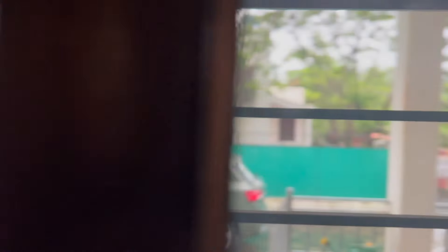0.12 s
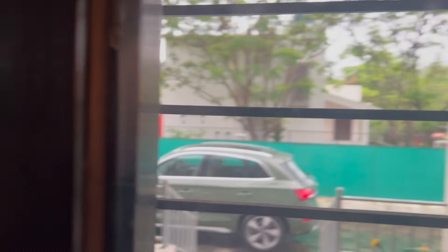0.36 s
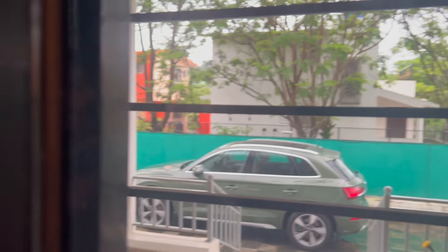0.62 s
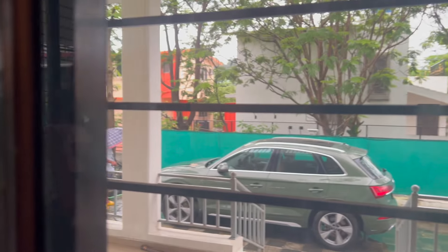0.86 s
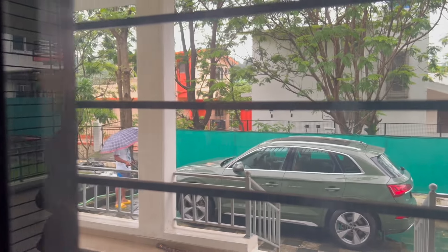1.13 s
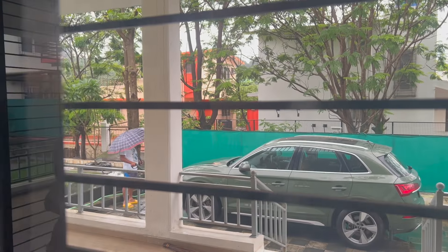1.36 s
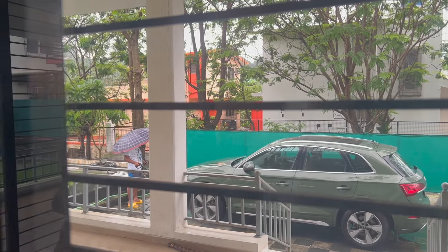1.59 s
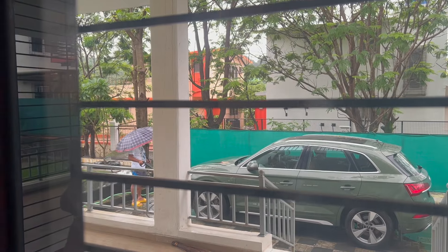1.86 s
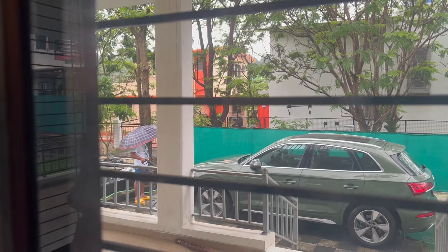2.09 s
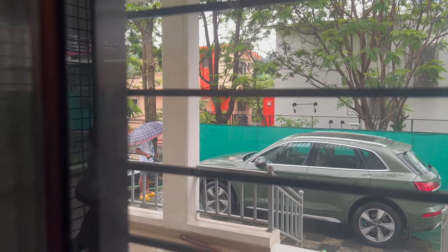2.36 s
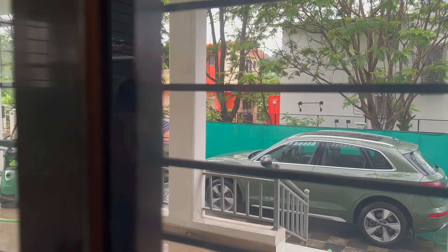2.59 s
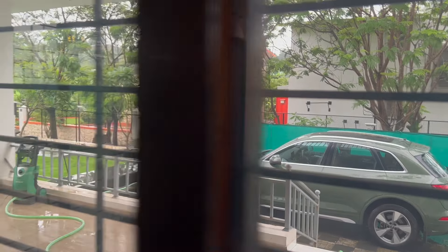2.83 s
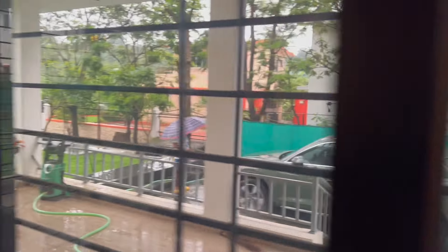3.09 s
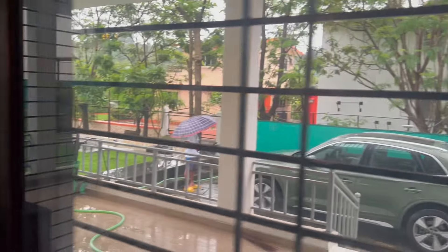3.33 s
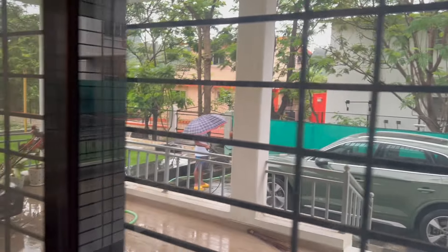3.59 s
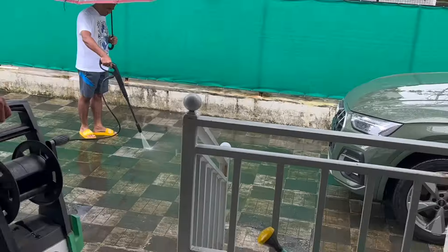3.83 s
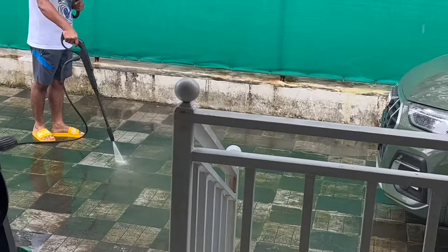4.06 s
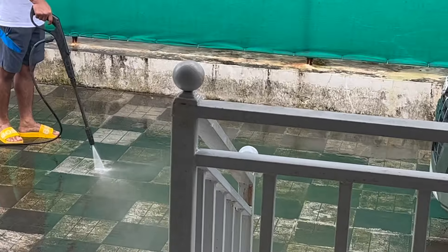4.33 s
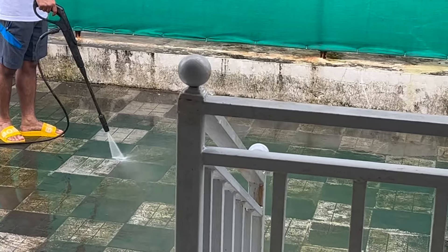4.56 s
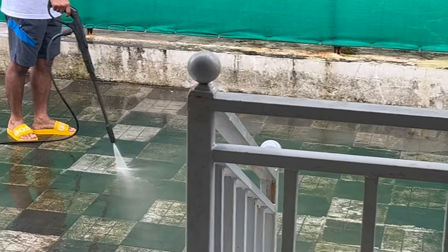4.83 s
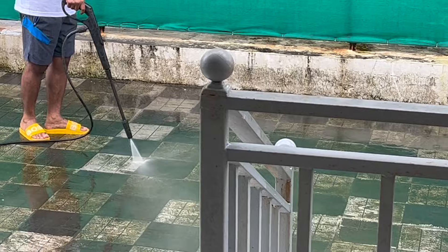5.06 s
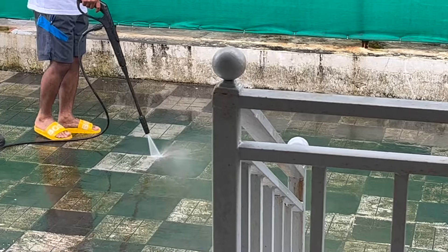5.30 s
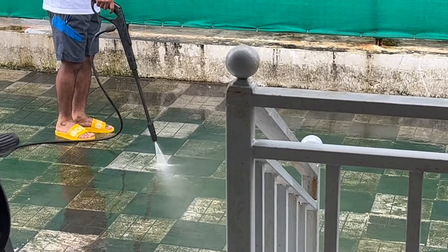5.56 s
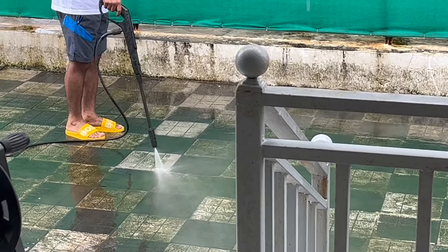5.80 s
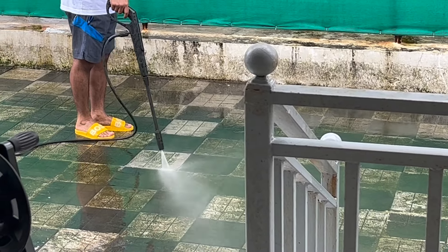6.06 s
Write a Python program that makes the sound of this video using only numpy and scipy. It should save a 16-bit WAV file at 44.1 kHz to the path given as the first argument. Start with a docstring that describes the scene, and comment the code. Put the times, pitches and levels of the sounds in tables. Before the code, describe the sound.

A handheld microphone moves along windows, hearing a continuous low buzzing pump with a thin gear whine and soft wash of spray and rain. Early handling thumps and a sharp tick stand close in front, with more low bumps around two seconds. Then an instant change of place: outdoors, right beside the washer, a dense rattling motor drone and bright jet hiss fill everything, steady and nearly overloaded.

```python
"""An electric pressure washer runs without pause on a wet porch, first heard through a window by a moving listener.
Its pump shaft drones in many orders, its gear whines, and jet and rain hiss as coloured noise. Low noise and bumps
make the handling, and a small hard tick sounds early on. Orders swell and the hiss brightens along the walk.
Then the place suddenly changes to close by and very loud."""
import sys
import numpy as np
from scipy import signal
from scipy.fft import rfft, irfft
from scipy.io import wavfile

SR = 44100
rng = np.random.default_rng(int(sys.argv[2]) if len(sys.argv) > 2 else 0)


def persist_wave(psi):
    """Save psi, clipped to +-1, as 16-bit WAV."""
    counts = np.round(np.clip(psi, -1, 1) * 32767).astype(np.int16)
    wavfile.write(sys.argv[1], SR, np.atleast_2d(counts).T)


def undo_db(level):
    """Turn decibels back into plain size, where 20 dB means ten times bigger."""
    steps = np.asarray(level, float) / 20
    return 10 ** steps


N = 272097
NEAR, FAR = 1, 2   # column of each place in the tables that hold both


def rms_one(x):
    """Scales a signal to an rms of 1."""
    return x / np.sqrt(np.mean(x ** 2) + 1e-20)


def in_time(rows):
    """Draws straight lines between rows of (seconds, values ..), one curve a column."""
    s, *columns = np.transpose(rows)
    return [np.interp(np.arange(N) / SR, s, c) for c in columns]


def at_hz(points, hz, column=1):
    """Reads a table over a logarithmic frequency axis."""
    points = np.array(points)
    return np.interp(np.log(np.maximum(hz, 1)), np.log(points[:, 0]), points[:, column])


def drift(rate_hz):
    """Slow chance of spread 1: lowpassed random knots, 40 a second, joined by straight lines."""
    knots = rng.standard_normal(int(N / SR * 40) + 42)
    memory = np.exp(-2 * np.pi * rate_hz / 40)
    slow = rms_one(signal.lfilter([1], [1, -memory], knots)[40:])
    return np.interp(np.arange(N) * 40 / SR, np.arange(len(slow)), slow)


def band(x, low_hz, high_hz):
    """Passes one band of frequencies."""
    return signal.sosfilt(signal.butter(2, [low_hz, high_hz], "band", fs=SR, output="sos"), x)


# The listener's walk along the windows. Each row: time in seconds, share of the way (0-1).
WALK_PATH = [(0, 0), (1, .224), (2.2, .466), (2.7, .534), (3.85, 1)]
# Shaft orders with standing-wave crests along the way. Each entry: multiple of the shaft rate.
SWELLING_ORDERS = [4, 5, 6, 7, 9, 11, 12, 13, 14, 16, 18, 23, 50, 100]
# The standing wave of each of those orders. Each row: place of a crest as share of the way, crest spacing
# as share of the way, echo strength (0-1), level change in dB at the start of the way, same at its end.
STANDING_WAVES = [(.4, .76, .48, 2.5, -6), (.33, .71, .43, -.5, 1.5), (.36, .63, .29, 3.5, -4.5),
                  (.356, .45, .83, -5, 5.5), (.3, .55, .37, -3, 4), (.5, 1, .4, -1, -1),
                  (.03, .63, .59, 5, -1), (.29, .3, .18, -.5, 3), (.18, .635, .26, -1, 3),
                  (.45, 1.08, .6, 1, -1), (.5, .59, .43, -2.5, 7), (.355, .432, .56, -5.5, 8.5),
                  (.088, .244, .75, 3, 5), (.336, .432, .58, 7.5, 0)]


def crests():
    """A direct and an echoed wave beat along the way: dB change of each swelling order over time."""
    way, = in_time(WALK_PATH)
    swells = {}
    for k, (place, spacing, echo, start_db, end_db) in zip(SWELLING_ORDERS, STANDING_WAVES):
        both_waves = abs(1 + echo * np.exp(2j * np.pi * (way - place) / spacing))
        trend_db = start_db + (end_db - start_db) * way
        swells[k] = trend_db + 20 * np.log10(both_waves / np.hypot(1, echo))
    return swells


# Shaft orders through the window; 50 and 100 are the gear teeth.
# Each row: multiple of the shaft rate, centre level in dB rms before swell and waver, side minus centre in dB.
FAR_SHAFT_ORDERS = [(1, -44, -22), (2, -44, -23), (3, -40, -21), (4, -38, -4), (5, -37, -4), (6, -35, -3),
                    (7, -36, 3), (8, -47, -1), (9, -42, -5), (10, -55, 5), (11, -37, -3), (12, -41, 1),
                    (13, -42, -5), (14, -43, -5), (15, -48, -1), (16, -45, -4), (17, -52, -2),
                    (18, -46, -1), (19, -52, 2), (20, -54, 7), (21, -57, 3), (22, -51, -3), (23, -47, -4),
                    (24, -54, 1), (25, -55, 4), (26, -56, 0), (28, -54, 0), (31, -57, -2), (34, -59, -4),
                    (50, -50, -7), (100, -62, -2)]
# Shaft orders close by; 50 and 100 are the gear teeth.
# Each row: multiple of the shaft rate, centre level in dB rms before waver, side minus centre in dB.
NEAR_SHAFT_ORDERS = [(1, -34, -25), (2, -23, -21), (3, -27, -12), (4, -13, -20), (5, -29, -15),
                     (6, -28, -9), (7, -23, -14), (8, -29, -2), (9, -22, -5), (10, -29, -9), (11, -24, -11),
                     (12, -26, -2), (13, -29, 1), (14, -31, -11), (15, -26, -2), (16, -36, -4),
                     (17, -36, -4), (18, -30, -6), (19, -30, -14), (20, -32, -16), (21, -41, -7),
                     (22, -34, -10), (23, -32, -27), (24, -30, -36), (28, -36, -36), (30, -36, -36),
                     (47, -40, -12), (48, -39, -14), (49, -36, -14), (50, -25, -11), (52, -42, -12),
                     (55, -40, -12), (56, -40, -13), (96, -45, -26), (99, -42, -23), (100, -30, -23),
                     (103, -42, -47)]
# Torque ripple of the mains, as side tones beside the pump's orders.
# Each row: multiple of the ripple rate, level against the order in dB near, same far.
TORQUE_RIPPLE = [(1, -13.5, -17), (-1, -24, -32), (2, -39, -20), (-2, -52, -25)]
RIPPLE_HZ = 100
# Unbalance of the rotor and its side tones.
# Each row: distance from the rotor rate in shaft orders, centre level in dB rms near, same far.
ROTOR_TONES = [(-2, -34, -57), (-1, -35, -54), (0, -24, -39), (1, -29, -55), (2, -40, -51), (3, -40, -54),
               (4, -37, -45), (5, -36, -52), (6, -39, -50), (10, -37, -54), (13, -37, -56), (49, -43, -65),
               (50, -41, -63), (51, -41, -65)]
ROTOR_ORDER = 50 / 11   # rotor turns per shaft turn
SECOND_KNOCK = .545   # the valves knock twice a turn, the second after this share of it


def machine(span, turns, orders, place, waver_db, swells, smear_rad):
    """Shaft orders and rotor tones as centre and side; the mains ripple adds side tones to orders below 30."""
    pump, gear = np.zeros((2, 2, len(turns)), complex)
    for k, level_db, side_db in orders:
        # orders line up into two knocks, smeared by echoes
        knocks = np.angle(1 + np.exp(-2j * np.pi * k * SECOND_KNOCK))
        phase = np.exp(1j * (knocks + smear_rad * rng.standard_normal()))
        side_start = rng.choice([-1j, 1j]) * undo_db(side_db)   # a quarter cycle off: left or right leads
        start = phase * np.array([[1], [side_start]])
        level = undo_db(level_db + swells.get(k, 0) + waver_db * drift(1.8)[span])
        tone = start * (level * np.exp(2j * np.pi * k * turns))
        part = pump if k < 30 else gear
        part += tone
    ripple_phase = 2j * np.pi * RIPPLE_HZ * np.arange(len(turns)) / SR
    pump *= 1 + sum(undo_db(row[place]) * np.exp(row[0] * ripple_phase) for row in TORQUE_RIPPLE)
    for row in ROTOR_TONES:
        start = np.exp(2j * np.pi * rng.random()) * np.array([[1], [1j * undo_db(-9.5)]])
        gear += start * undo_db(row[place]) * np.exp(2j * np.pi * (ROTOR_ORDER + row[0]) * turns)
    return np.sqrt(2) * (pump + gear).real


# Trend of the many faint higher orders. Each row: multiple of the shaft rate, level in dB near, same far.
FAINT_LEVELS = [(25, -45, -62), (45, -44, -65), (60, -46, -68), (72, -49, -72), (84, -54, -74),
                (96, -48, -72), (105, -46, -75)]


def faint_orders(turns, orders, place, spread_db, side_db):
    """One shaft turn holding the remaining higher orders at uneven levels, repeated."""
    k = np.setdiff1d(np.arange(25, 106), np.array(orders)[:, 0].astype(int))
    level = undo_db(at_hz(FAINT_LEVELS, k, place) + spread_db * rng.standard_normal((2, len(k))))
    lines = np.zeros((2, 2049), complex)
    lines[:, k] = level * np.exp(2j * np.pi * rng.random((2, len(k))))
    one_turn = irfft(lines) * 4096 / np.sqrt(2)
    repeated = np.array([np.interp(turns % 1 * 4096, np.arange(4096), c) for c in one_turn])
    return repeated * undo_db(np.array([[0], [side_db]]))


# Jet, splash and rain through the window.
# Each row: frequency in Hz, centre and side power together in dB per Hz before flicker and treble change.
FAR_HISS_COLOUR = [(40, -65), (80, -58.5), (150, -60.5), (280, -57), (500, -60.5), (800, -58.5),
                   (1200, -62.5), (1800, -66), (2500, -73.5), (3100, -72), (4500, -79.5), (7000, -79),
                   (10000, -90), (11500, -87), (15500, -97)]
# Jet, splash and rain close by.
# Each row: frequency in Hz, centre and side power together in dB per Hz before flicker and treble change.
NEAR_HISS_COLOUR = [(40, -53), (80, -60.5), (150, -52.5), (280, -45), (500, -48), (800, -48), (1200, -51),
                    (2300, -59.5), (2750, -56), (3400, -59.5), (5400, -62.5), (7000, -58.5), (10000, -62),
                    (11500, -58), (15500, -64)]
# Width of the hiss: the side outweighs the centre around 10 kHz, the centre outweighs it near 13.8 kHz.
# Each row: frequency in Hz, side minus centre in dB near, same far.
HISS_WIDTH = [(60, -6, -21), (200, -17, -21), (326, -20, -4), (560, -3, 1), (1100, -8, 1), (1700, -23, 4.5),
              (2230, -33, -2.5), (3400, -4.5, 3.5), (4900, -27, -4.5), (7650, -13, 0.5), (8660, -6, -2),
              (9230, 17, 7.5), (10170, 38, 33), (10920, 4.5, 4), (12250, -4, -3), (13300, -28, -18),
              (13800, -36, -25), (14300, -3.5, -1)]


def hiss(span, turns, spectrum, place, treble_db, patchy_db, throb, tied):
    """Coloured noise as centre and side; octave bands flicker, and the pressure throbs with the pistons."""
    length = len(turns)
    hz = np.fft.rfftfreq(length, 1 / SR)
    side = undo_db(at_hz(HISS_WIDTH, hz, place))
    split = np.array([np.ones_like(side), side]) / np.sqrt(1 + side ** 2)
    colour = undo_db(at_hz(spectrum, hz)) * np.sqrt(SR / 2) * split
    centre, other = rfft(rng.standard_normal((2, length)))
    # tied: share of the side's power that is the centre, a quarter cycle off
    noise = np.array([centre, 1j * np.sqrt(tied) * centre + np.sqrt(1 - tied) * other]) * colour
    together, out = drift(3.8)[span], 0
    for octave in range(9):   # overlapping bands centred on 60 Hz, 120 Hz, ..
        share = np.cos(np.clip(np.log2(hz / 60 + 1e-9) - octave, -1, 1) * np.pi / 2) ** 2
        flicker_db = patchy_db * (0.32 * together + 0.9 * drift(16)[span])
        brightness_db = treble_db * np.clip(octave - 4, 0, 3) / 3
        out = out + undo_db(flicker_db + brightness_db) * irfft(noise * share, length)
    angle = 2 * np.pi * turns
    return out * (1 + throb * (np.cos(angle) + 1.1 * np.cos(2 * angle) + 0.41 * np.cos(3 * angle)))


# Gusts on the microphone. Each row: middle in seconds, level at the middle in dB, half length in seconds.
GUST_ROWS = [(0, -37, 0.26), (.6, -43, .2), (1.25, -36, .12), (1.928, -30, .2)]
# Soft low bumps of handling. Each row: start in seconds, level in dB, pitch in Hz.
HANDLING_BUMPS = [(.06, -29, 163), (.135, -21.5, 127.5), (.2, -29, 104), (.48, -23.5, 166), (.535, -25, 99),
                  (.63, -31, 95), (1.791, -25, 200), (1.955, -19, 98), (2.059, -27, 130)]
RUMBLE_START_DB, RUMBLE_FADE_DB_PER_S = -41, 4.5   # dull rumble between gusts


def rumble():
    """Low noise swelling in gusts, and bumps of ring and thud, nearly the same on both sides."""
    t = np.arange(N) / SR
    gusts = sum(undo_db(db) * np.exp(-((t - s) / half_s) ** 2) for s, db, half_s in GUST_ROWS)
    steady = undo_db(RUMBLE_START_DB - RUMBLE_FADE_DB_PER_S * t)
    out = (steady + gusts) * rms_one(band(rng.standard_normal(N), 83, 430))
    since = np.arange(SR // 4) / SR
    swell_and_fade = undo_db(-60 * since / 0.17) * (1 - np.exp(-since / 0.016))
    thuds = rng.standard_normal((len(HANDLING_BUMPS), len(since)))
    for (s, level_db, hz), thud in zip(HANDLING_BUMPS, thuds):
        ring = np.sin(2 * np.pi * hz * since)
        body = ring + .6 * rms_one(band(thud, .7 * hz, 2.2 * hz))
        first = round(s * SR)
        out[first:first + len(since)] += undo_db(level_db) * swell_and_fade * 2 * body
    return out * undo_db(np.array([[0], [-16]]))   # centre, side


# A small hard tick and its bounce. Each row: start in seconds, level in dB.
TICK_HITS = [(0.131, -18), (0.137, -31)]
# Bands of the tick. Each row: low edge in Hz, high edge in Hz, level in dB, tail against the burst in dB.
TICK_BANDS = [(3150, 3670, -4.5, -25), (3830, 5350, -2.5, -18), (5600, 8800, -14, -16),
              (11000, 14000, -17, -24)]


def ticks():
    """Each tick is a burst of bright noise of a few ms with a tail from the walls."""
    out, t, white = np.zeros((2, N)), np.arange(SR) / SR, rng.standard_normal((2, SR))
    hits = np.array(TICK_HITS)
    since = np.array([np.where(t >= s, t - s, 9) for s in hits[:, 0]])   # 9 s: silent before the hit
    for low_hz, high_hz, level_db, tail_db in TICK_BANDS:
        decay = undo_db(-60 * since / 0.011) + undo_db(tail_db - 60 * since / 0.47)
        envelope = undo_db(hits[:, 1]) @ decay
        burst = band(band(white * envelope, low_hz, high_hz), low_hz, high_hz)
        out[:, :SR] += undo_db(level_db) * np.sqrt(SR / 2 / (high_hz - low_hz)) * burst
    return out * undo_db(np.array([[-2], [-7]]))   # centre, side


# The listener turns. Each row: time in seconds, lean of the low middle as left minus right in dB.
LISTENER_TURN = [(0, -3), (1.7, -5.5), (2.7, -5), (3.1, 2), (3.8, 0)]


def lean(left_right):
    """The low middle leans to one side as the listener turns."""
    lean_db, = in_time(LISTENER_TURN)
    low_middle = signal.sosfiltfilt(signal.butter(1, [170, 800], "band", fs=SR, output="sos"), left_right)
    return left_right + (undo_db(np.array([[.5], [-.5]]) * lean_db) - 1) * low_middle


FAR_TURNS_PER_S, NEAR_TURNS_PER_S = 60.025, 60.625   # pump shaft
SLOW_START_TURNS_PER_S, SETTLE_S = .18, .6   # at first the shaft runs this much slower, and picks up
# the hiss brightens along the way to the open window
TREBLE_START_DB, TREBLE_RISE_DB_PER_SHARE, TREBLE_TOP_DB = -3, 9, 0
MOVE_S, MOVE_LENGTH_S = 3.862, 0.017   # middle and length of the crossfade to the porch


def scene():
    """The far place gives way to the near one; centre and side become left and right."""
    t = np.arange(N) / SR
    far_speed = FAR_TURNS_PER_S - SLOW_START_TURNS_PER_S * np.clip(1 - t / SETTLE_S, 0, 1)
    turns = np.cumsum(np.where(t < MOVE_S, far_speed, NEAR_TURNS_PER_S)) / SR
    far, near = slice(0, 172032), slice(N - 102400, N)   # samples; they overlap around the move
    far_turns, near_turns = turns[far], turns[near]

    way, = in_time(WALK_PATH)
    treble_db = np.minimum(TREBLE_START_DB + TREBLE_RISE_DB_PER_SHARE * way, TREBLE_TOP_DB)[far]
    swells = {k: db[far] for k, db in crests().items()}
    indoors, porch = rumble() + ticks(), np.zeros((2, N))
    indoors[:, far] += machine(far, far_turns, FAR_SHAFT_ORDERS, FAR, waver_db=0.94, swells=swells, smear_rad=3.15)
    indoors[:, far] += hiss(far, far_turns, FAR_HISS_COLOUR, FAR, treble_db=treble_db,
                            patchy_db=0.96, throb=0.039, tied=.1)
    indoors[:, far] += faint_orders(far_turns, FAR_SHAFT_ORDERS, FAR, spread_db=3.0, side_db=-1.0)

    porch[:, near] += machine(near, near_turns, NEAR_SHAFT_ORDERS, NEAR, waver_db=0.5, swells={}, smear_rad=1.0)
    porch[:, near] += hiss(near, near_turns, NEAR_HISS_COLOUR, NEAR, treble_db=.4,
                           patchy_db=0.9, throb=0.044, tied=0.57)
    porch[:, near] += faint_orders(near_turns, NEAR_SHAFT_ORDERS, NEAR, spread_db=2.0, side_db=-18.0)

    moved = np.clip((t - MOVE_S) / MOVE_LENGTH_S + .5, 0, 1)
    to_left_right = np.array([[1, 1], [1, -0.89]])
    return (1 - moved) * lean(to_left_right @ indoors) + moved * (to_left_right @ porch)


def top_cut(x):
    """Nothing passes above the cut-off."""
    return signal.sosfilt(signal.butter(12, 15650, fs=SR, output="sos"), x)


def record(dry):
    """The loudest peaks are clipped flat at full scale."""
    clipped = np.clip(dry, -1, 1)
    return top_cut(clipped)


dry = scene()
out = record(dry)
persist_wave(out)
```